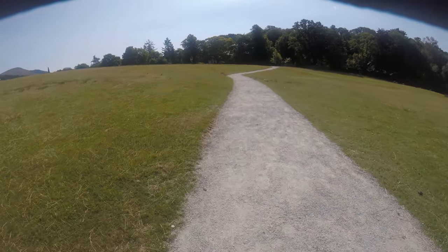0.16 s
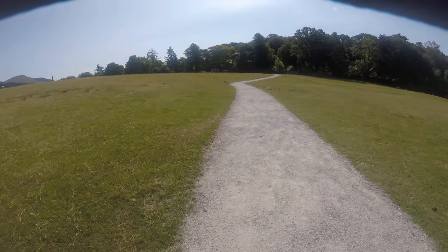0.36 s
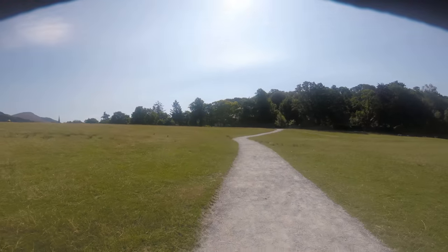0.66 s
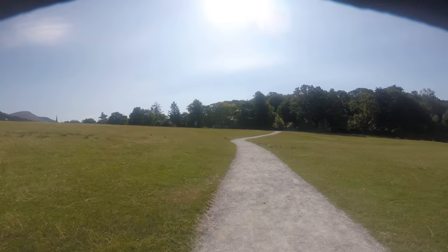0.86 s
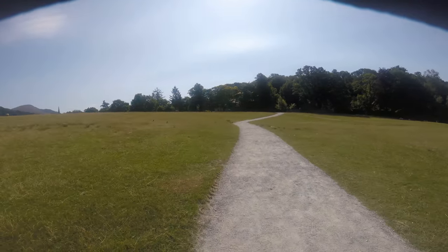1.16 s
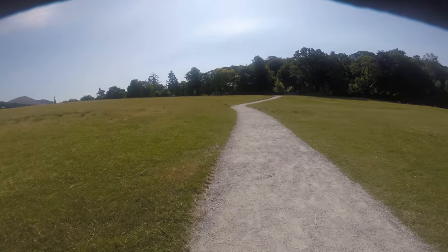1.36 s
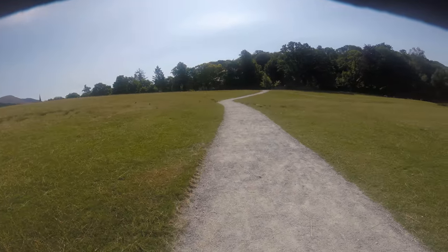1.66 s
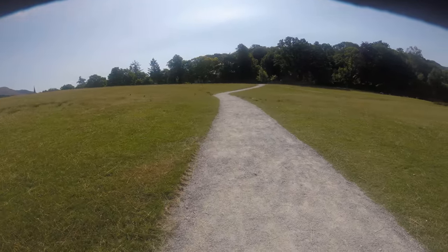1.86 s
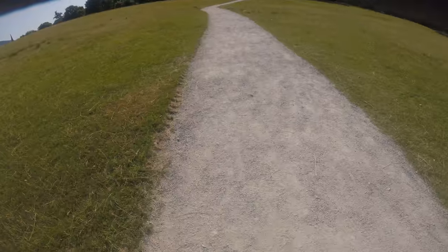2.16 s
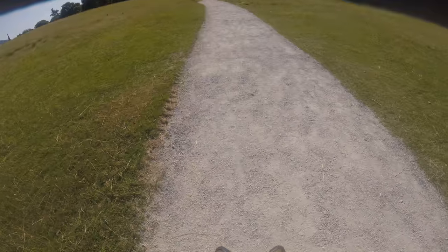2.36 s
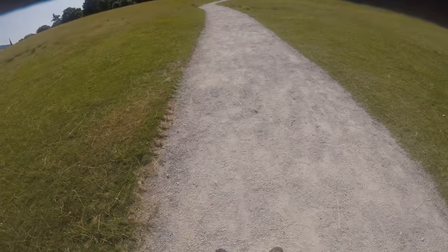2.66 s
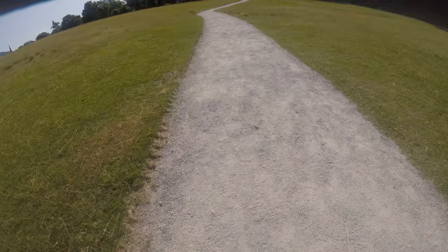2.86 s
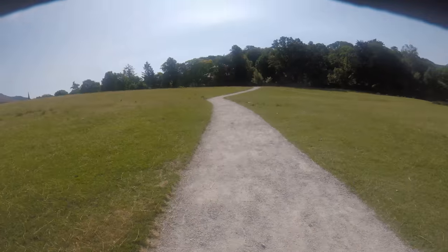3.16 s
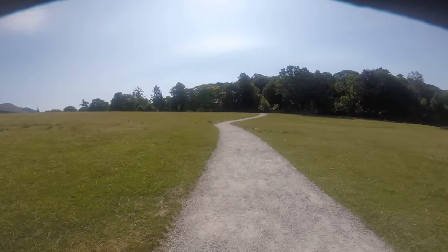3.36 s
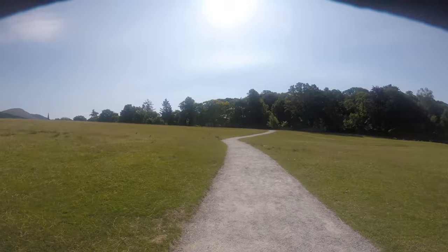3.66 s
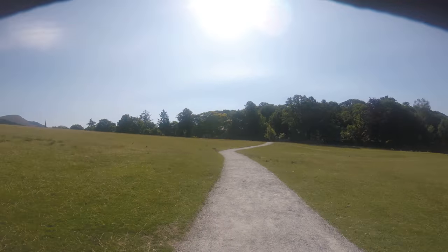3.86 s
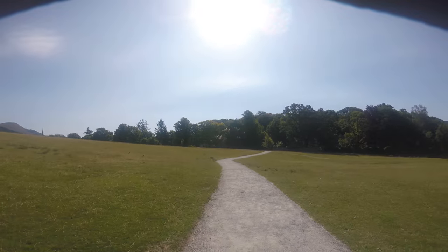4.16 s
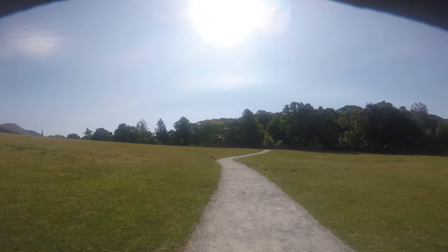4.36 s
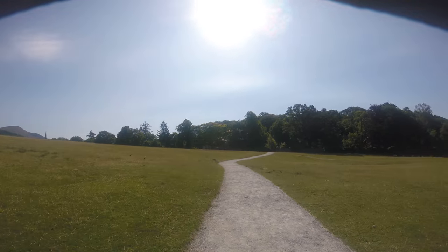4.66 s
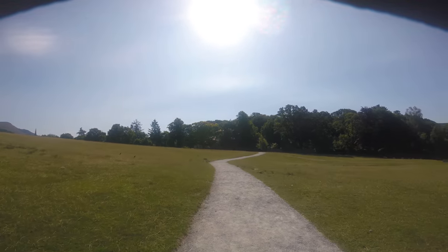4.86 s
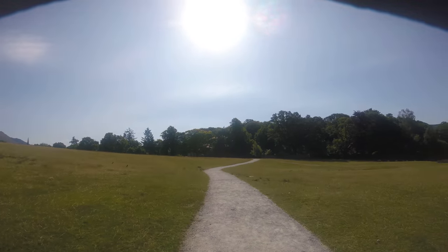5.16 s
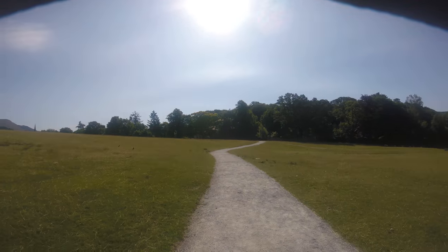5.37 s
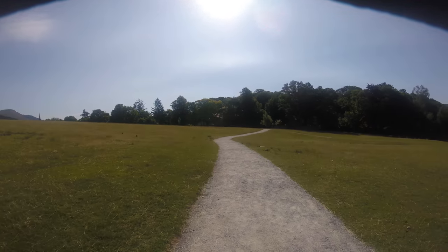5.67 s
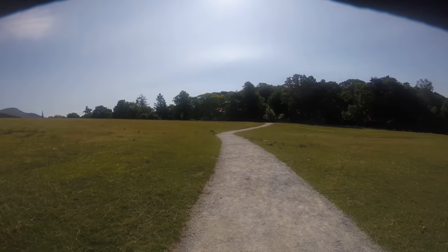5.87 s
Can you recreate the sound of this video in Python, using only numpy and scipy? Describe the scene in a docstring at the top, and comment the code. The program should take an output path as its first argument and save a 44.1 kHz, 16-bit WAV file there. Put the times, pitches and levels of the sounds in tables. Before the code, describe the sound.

A wheelchair rolls without pause along a fine gravel path in an open field, miked close from the chair, mono, dry, with a faint even hiss. Tyres grind stones in a dense grainy crunch, strongest in the first 0.5 s, then softer and uneven. Underneath are a deep bouncing rumble and a dull hollow frame drone. Wind thumps the microphone in quick puffs from 0 to 0.4 s, again around 1.2 and 1.6 s, then in longer low buffeting from 2 to 3 s; afterwards the gusts are gone. Bright grit ticks cluster in the first half second. A hard knock and stone crack land at 1.2 s, a smaller knock at 1.4 s, and a bright snap at 2.4 s. From 3 s it is calmer crackling with scattered snaps. Ticks gather from 4.6 s, the crunch swells with a strong crack at 4.9 s, then steady rolling continues to the end at about 6 s.

```python
"""A wheelchair rolls along a fine gravel path across an open field, miked close from a camera riding on it.
Pressed stones grind under the tyres as dense random contacts coloured by the wheels; single ones snap or crack.
Flung grit ticks on the chair as short bright bursts, and bumps knock the resonant modes of its frame.
Filtered noise makes the chair's low rumble and drone, the gusts on the microphone and a faint even hiss."""
import sys
import numpy as np
from scipy import signal
from scipy.fft import rfft, irfft
from scipy.io import wavfile
from scipy.ndimage import uniform_filter1d

SR = 44100
rng = np.random.default_rng(int(sys.argv[2]) if len(sys.argv) > 2 else 0)


def dump_mix(stems):
    """Bounce the given channels to the path in sys.argv[1] as a 16-bit WAV at rate SR."""
    frames = np.atleast_2d(stems).T  # one column per channel
    limited = np.clip(frames, -1, 1)  # hard clip at full scale
    pcm = np.round(limited * 32767).astype(np.int16)
    wavfile.write(sys.argv[1], SR, pcm)


N = 265923
TIME = np.arange(N) / SR
TOP_HZ = 15300  # upper limit of the camera's treble

# how hard the tyres grind the path: [t/s, level/dB]
GRIND_LEVEL = [(0, -39), (.44, -39), (.62, -47.5), (.78, -45.5), (1.1, -42.5), (1.4, -42.5), (2.02, -42.5),
               (2.16, -43.5), (2.8, -46.5), (2.97, -42.5), (3.6, -41.5), (3.79, -46), (4.5, -42.5),
               (4.9, -37.5), (5.08, -41.5), (5.35, -42.5), (5.66, -44.5), (5.85, -43.5)]
# modes of the frame: [f/Hz, width/Hz, level/dB]
FRAME_MODES = [(167.8, 53, 11), (252, 120, 0), (428, 103, -2), (564, 10.2, 5.5), (792, 86, -4.5),
               (1294, 620, -3), (1968, 16, 1.5)]
# spectrum of a bright tick or click: [f/Hz, level/dB per Hz]
TICK_SPECTRUM = [(500, 21.5), (2000, 17), (4000, 17.5), (5200, 13.5), (7000, 12), (9500, 10), (13000, -1),
                 (15500, -7)]


def undb(db):
    """Decibels to gain."""
    return 10 ** (np.asarray(db) / 20)


def unit(x):
    """Scale to rms 1."""
    return x / np.sqrt(np.mean(x ** 2))


def gain_curve(table):
    """A curve of times and levels as a gain per sample."""
    s, db = np.transpose(table)
    return undb(np.interp(TIME, s, db))


def walk(rate):
    """Smooth random wandering with spread 1, from `rate` new values per second."""
    hold = max(int(SR / rate), 2)
    steps = rng.standard_normal(N)[np.arange(N) // hold]
    return unit(uniform_filter1d(steps, hold))


def swell(start, length, attack_s, release_s):
    """Envelope that rises up to its start, holds for its length and dies away."""
    early = np.maximum(start - TIME, 0)
    late = np.maximum(TIME - start - length, 0)
    return np.exp(-(early / attack_s) ** 2 - late / release_s)


def colour(x, points, size=8192):
    """Causal (minimum-phase) filter with a spectrum of frequency and dB points."""
    hz, db = np.transpose(points)
    bins_hz = np.arange(size // 2 + 1) * SR / size
    gain_db = np.interp(np.log(bins_hz + 1), np.log(hz), db)
    # folding the cepstrum onto positive time makes the filter causal
    cepstrum = irfft(np.log(undb(gain_db)))
    cepstrum[1:size // 2] *= 2
    cepstrum[size // 2 + 1:] = 0
    response = irfft(np.exp(rfft(cepstrum)))
    return signal.fftconvolve(x, response)[:len(x)]


def lowpass(x, order, hz):
    """Roll off the treble above hz."""
    return signal.sosfilt(signal.butter(order, hz, fs=SR, output="sos"), x)


def resonate(x, hz, width):
    """One resonance, gain 1 at its centre."""
    hz = min(hz, TOP_HZ)
    b, a = signal.iirpeak(hz, hz / min(width, TOP_HZ), fs=SR)
    return signal.lfilter(b, a, x)


def ring(x, modes):
    """A body with several resonances, summed."""
    return sum(undb(db) * resonate(x, hz, width) for hz, width, db in modes)


def add(track, s, db, sound):
    """Put a sound into the track at its time; db is the peak of its envelope."""
    start = max(int(s * SR), 0)
    part = sound[:N - start]
    peak = np.sqrt(2 * uniform_filter1d(sound ** 2, size=64, mode="constant").max())
    track[start:start + len(part)] += undb(db) * part / peak


def scrape(decay_s, size=4096):
    """One contact: a burst of tiny slips that dies away."""
    return rng.standard_normal(size) * np.exp(-np.arange(size) / SR / decay_s)


def stone(hz, q, decay_s):
    """A sharp contact and its short scrape, coloured by the size of the stone."""
    contact = unit(scrape(decay_s))
    contact[0] += 0.61 * np.sqrt(len(contact))
    # the stone rings in a broad band, and its finite contact time dulls what lies far above
    band = resonate(resonate(contact, hz, hz / q), hz, hz / q)
    return lowpass(band, 2, min(2.05 * hz, TOP_HZ))


def grains(rate, spread_db, lo_hz, hi_hz, q, decay_s, cap, count=20):
    """Random contacts, `rate` per second, of stones of many sizes; most are faint, a few are strong."""
    out = np.zeros(N)
    for hz in np.geomspace(lo_hz, hi_hz, count):
        chance = rng.random(N) * count * SR / rate
        hit = chance < 1
        strength_db = spread_db * np.minimum(-np.log(chance[hit]), cap)
        pulses = np.zeros(N)
        pulses[hit] = undb(strength_db)
        grain = unit(stone(hz, q, decay_s))[:SR // 50]
        out += signal.oaconvolve(pulses, grain)[:N]
    return out


def through_wheels(x):
    """Sound from the tyre contact, with the ring of the wheels added."""
    # resonances that colour the gravel: [f/Hz, width/Hz, level/dB]
    wheel_modes = [(897, 105, 4), (1250, 207, 0.5), (1875, 48, 1.5), (3284, 92, 3), (3600, 140, -2),
                   (4870, 150, -10)]
    return x + ring(x, wheel_modes)


def hiss():
    """A faint even hiss: steady noise of a fixed spectrum."""
    # [f/Hz, level/dB per Hz]
    hiss_spectrum = [(100, -1.5), (1000, -0.5), (3500, -10.5), (5500, -3), (7200, -4), (10000, -8),
                     (13000, -14), (15500, -21)]
    return undb(-60.5) * unit(colour(rng.standard_normal(N), hiss_spectrum))


def wind():
    """Large eddies throb on the microphone; smaller ones flutter as a gust hits."""
    # gusts: [t/s, length/s, large eddies level/dB, small eddies level/dB]
    gusts = [(0, 0.023, -24, -22), (0.071, 0.024, -22, -27.5), (0.153, 0.045, -14.5, -22.5),
             (0.318, 0.028, -21, -33.5), (.405, 0.012, -23.5, -19.5), (1.213, 0.033, -20.5, -44),
             (1.598, 0.02, -31, -26.5), (1.659, 0.038, -13.5, -25.5), (2.007, 0.021, -13, -19),
             (2.086, 0.13, -18, -22), (2.276, 0.54, -15.5, -31.5), (2.858, 0.18, -19.5, -37)]
    # spectrum of the large eddies: [f/Hz, level/dB per Hz]
    large_spectrum = [(10, -12), (22, -4), (36, 8.5), (55, -1), (80, -4.5), (120, -27.5), (250, -40.5),
                      (1000, -53), (8000, -125)]
    # spectrum of the small eddies: [f/Hz, level/dB per Hz]
    small_spectrum = [(20, -13), (55, -12.5), (85, 3), (125, -2.5), (180, -10), (300, -27.5), (700, -44.5),
                      (3000, -61), (12000, -115)]
    large = small = out = 0
    for s, length, large_db, small_db in gusts:
        gust = swell(s, length, attack_s=0.024, release_s=0.019)
        large = large + undb(large_db) * gust
        small = small + undb(small_db) * gust
    for gain, spectrum in ((large, large_spectrum), (small, small_spectrum)):
        eddies = colour(rng.standard_normal(N), spectrum)
        # even out the noise, so that the gusts set its level
        eddies /= np.sqrt(uniform_filter1d(eddies ** 2, size=SR // 12))
        out = out + gain * eddies * undb(1.1 * walk(rate=20))
    return out


def chair_sway():
    """The rough path keeps the loaded chair bouncing on its tyres, at a few low resonances."""
    # bouncing along the path: [t/s, level/dB]
    bounce = [(0, -22.5), (.9, -27.5), (2.3, -23), (3.15, -25.5), (3.45, -25), (4.3, -28), (5.05, -30),
              (5.21, -24.5), (5.4, -32), (6.03, -29)]
    # resonances, each passed twice: [f/Hz, width of one pass/Hz, level/dB]
    sway_modes = [(22.04, 11.8, 4.5), (53.4, 7.7, 0), (78, 30.4, -13.5), (110.7, 12.6, -16.5)]
    path = rng.standard_normal(N)
    sway = unit(sum(undb(db) * resonate(resonate(path, hz, width), hz, width)
                    for hz, width, db in sway_modes))
    # steady rolling keeps feeding the bounce, so its strength stays even
    sway /= np.sqrt(uniform_filter1d(sway ** 2, size=SR // 5))
    return gain_curve(bounce) * sway


def frame_drone():
    """Unsteady jolts excite the frame's modes, which drone more as the tyres grind harder."""
    mean_db, follow = -39.5, 0.47  # follow: dB of drone per dB of grinding
    jolts = rng.standard_normal(N) * undb(2.7 * walk(rate=45))
    drone = unit(ring(lowpass(jolts, 1, 700), FRAME_MODES))
    return undb(mean_db) * unit(gain_curve(GRIND_LEVEL) ** follow) * drone


def frame_bumps():
    """A jolt shakes the modes of the frame, and one decaying tone rings with them."""
    # bumps: [t/s, peak level/dB, tone f/Hz, tone width/Hz, decay of the push/s]
    bumps = [(.004, -19, 413, 28, 0.0058), (.575, -19, 453, 160, 0.0022), (1.173, -22.5, 480, 160, 0.01),
             (1.186, -28, 479, 18, .008), (1.191, -15.5, 256, 24.4, 0.0066), (1.212, -20, 154, 10, .008),
             (1.408, -20, 378, 37, 0.0057), (2.582, -23.5, 568, 10.5, .008), (4.879, -27, 261, 70, 0.0084),
             (5.277, -26, 443, 17, .008)]
    # the soft tyre passes little treble to the frame: [f/Hz, level/dB]
    tyre_spectrum = [(100, -2), (450, -1.5), (900, -6.5), (5000, -35)]
    out = np.zeros(N)
    age = np.arange(SR // 3) / SR
    for s, db, hz, width, push_s in bumps:
        push = colour(scrape(decay_s=push_s, size=len(age)), tyre_spectrum)
        knock = ring(push, FRAME_MODES)
        tone = np.sin(2 * np.pi * hz * age) * np.exp(-np.pi * width * age)
        add(out, s, db, 1.75 * knock / np.abs(knock).max() + tone)
    return out


def flung_grit():
    """Grit strikes hard parts of the chair: short bright bursts with the ring of the part struck."""
    # ticks: [t/s, peak level/dB]
    ticks = [(0.0236, -28), (0.1143, -25), (.127, -36), (.189, -31.5), (0.4488, -25.5), (1.066, -36),
             (1.099, -32.5), (1.236, -31), (1.3905, -28), (1.821, -36.5), (4.567, -27), (4.6556, -28.5),
             (4.676, -33), (4.7417, -30), (5.063, -31), (5.1596, -26), (5.92, -29.5)]
    out = np.zeros(N)
    for s, db in ticks:
        contact = scrape(decay_s=0.004)
        struck_part = resonate(contact, hz=5050, width=470)
        add(out, s, db, colour(contact + undb(1.5) * struck_part, TICK_SPECTRUM))
    return out


def snapping_stones():
    """Single stones snap out from under a tyre, each with a bright click as it lets go."""
    # snaps: [t/s, peak level/dB, click peak level/dB]
    snaps = [(0.1187, -25, -37), (.163, -27, -41), (0.386, -23.5, -49), (0.556, -24.5, -36),
             (0.7146, -25, -43), (0.8156, -29, -45), (0.841, -25.5, -46), (0.9965, -26.5, -49),
             (1.276, -31.5, -43), (1.6444, -26.5, -53), (1.814, -28.5, -43), (1.9364, -27.5, -42),
             (2.2957, -24, -39), (2.4132, -22.5, -28), (2.862, -29.5, -47), (2.947, -35, -41),
             (3.459, -27.5, -47), (3.495, -25.5, -41), (3.519, -24, -47), (4.088, -31, -48),
             (4.568, -24.5, -41), (4.584, -26.5, -43), (4.709, -34, -45), (4.8516, -29, -46),
             (4.858, -23.5, -49), (5.088, -23.5, -38), (5.2, -31, -46), (5.795, -30.5, -46)]
    pitch_hz, pitch_scatter = 3240, 0.15  # scatter as a share of the pitch
    out = np.zeros(N)
    for s, db, click_db in snaps:
        hz = pitch_hz * np.exp(pitch_scatter * rng.standard_normal())
        add(out, s, db, through_wheels(stone(hz, q=2.06, decay_s=0.0012)))
        add(out, s, click_db, colour(scrape(decay_s=0.0013), TICK_SPECTRUM))
    return out


def cracking_stones():
    """Larger stones crack together: lower, broader bursts coloured by the wheels."""
    # cracks: [t/s, peak level/dB, f/Hz, decay/s]
    cracks = [(0.057, -31, 1820, 0.003), (.429, -27, 1350, .0017), (1.167, -28, 2490, 0.01),
              (1.1824, -17.5, 1720, 0.0052), (1.8285, -24.5, 1250, 0.0042), (1.874, -22.5, 1440, .001),
              (1.889, -28, 1480, 0.0027), (1.98, -25.5, 2070, 0.0099), (2.021, -27, 1730, 0.011),
              (2.0782, -28.5, 1530, 0.0026), (2.579, -27, 1280, 0.011), (2.7, -31.5, 1410, 0.003),
              (2.949, -31, 1690, 0.011), (3.1043, -25, 1850, 0.0027), (3.113, -29.5, 2430, 0.0023),
              (3.5958, -24.5, 1640, 0.00071), (3.7208, -26, 1540, 0.0018), (4.106, -28.5, 2080, 0.004),
              (4.4353, -24.5, 1900, 0.0021), (4.45, -26.5, 1840, 0.0023), (4.882, -17, 1780, 0.0037),
              (5.325, -26.5, 1410, 0.0061), (5.362, -30, 1400, 0.0048)]
    out = np.zeros(N)
    for s, db, hz, decay_s in cracks:
        add(out, s, db, through_wheels(stone(hz, q=0.78, decay_s=decay_s)))
    return out


def gravel():
    """Pressed stones crunch and loose grit crackles, in clusters as the tyres meet patches."""
    # patches of loose grit under the tyres: [t/s, length/s, coarse crackle level/dB, fine spray level/dB]
    loose_grit = [(.05, 0.064, -60, -56), (0.174, 0.22, -58, -46), (.44, 0.054, -48.5, -52),
                  (0.996, .14, -45.5, -55), (1.296, 0.1, -44.5, -51), (2.268, 0.42, -46, -57),
                  (3.406, 0.09, -49, -67), (4.295, 0.17, -47.5, -63), (4.58, 0.2, -48.5, -56),
                  (4.826, 0.15, -43, -49), (5.798, 0.39, -45.5, -53)]
    # spectrum shaping the pressed stones: [f/Hz, level/dB per Hz]
    crunch_spectrum = [(150, -12), (400, 3.5), (680, -7), (1000, -10), (1400, -4.5), (2200, -0.5),
                       (3000, -1), (4500, -14.5), (8000, -36), (15000, -67)]
    # spectrum shaping the coarse loose grit: [f/Hz, level/dB per Hz]
    crackle_spectrum = [(400, -43), (1200, -3), (2400, -7.5), (3600, -0.5), (4400, -7), (5600, -11.5),
                        (7500, -14.5), (10000, -34), (15000, -41)]
    # spectrum of the finest grit: [f/Hz, level/dB per Hz]
    spray_spectrum = [(1500, -17), (3000, 1), (4200, -0.5), (5650, -11), (6200, -16.5), (8500, -19),
                      (14000, -40)]
    crunch_db, crackle_db, spray_db = -1.34, -6.5, -16  # ever-present, relative to the grinding level

    grind = gain_curve(GRIND_LEVEL)
    coarse = fine = 0
    for s, length, coarse_db, fine_db in loose_grit:
        crossing = swell(s, length, attack_s=0.048, release_s=0.069)
        coarse = np.maximum(coarse, undb(coarse_db) * crossing)
        fine = np.maximum(fine, undb(fine_db) * crossing)
    crackle_gain = np.hypot(undb(crackle_db) * grind, coarse)
    spray_gain = np.hypot(undb(spray_db) * grind, fine)

    # quick and slower unevenness of the path
    patches = undb(1.6 * walk(rate=90)) * undb(1.0 * walk(rate=24))
    crunch = grains(rate=1300, spread_db=4.2, lo_hz=600, hi_hz=2800, q=.8, decay_s=.0011, cap=4.2)
    crackle = grains(rate=650, spread_db=5.2, lo_hz=2200, hi_hz=6000, q=.6, decay_s=.0007, cap=3.6)
    crunch = unit(through_wheels(colour(crunch, crunch_spectrum)) * patches)
    crackle = unit(through_wheels(colour(crackle, crackle_spectrum)) * patches)
    # the finest grit is so dense that it merges into a rush
    spray = unit(colour(rng.standard_normal(N), spray_spectrum) * patches)
    return undb(crunch_db) * grind * crunch + crackle_gain * crackle + spray_gain * spray


def scene():
    """The rolling chair and the wind over a faint even hiss, in one channel."""
    background = hiss() + wind()
    chair = chair_sway() + frame_drone() + frame_bumps()
    path = flung_grit() + snapping_stones() + cracking_stones() + gravel()
    return (background + chair + path)[None]


def record(dry):
    """The camera cuts the top of the treble with a steep low-pass."""
    return signal.sosfilt(signal.ellip(10, .2, 80, TOP_HZ, fs=SR, output="sos"), dry)


dry = scene()
out = record(dry)
dump_mix(out)
```